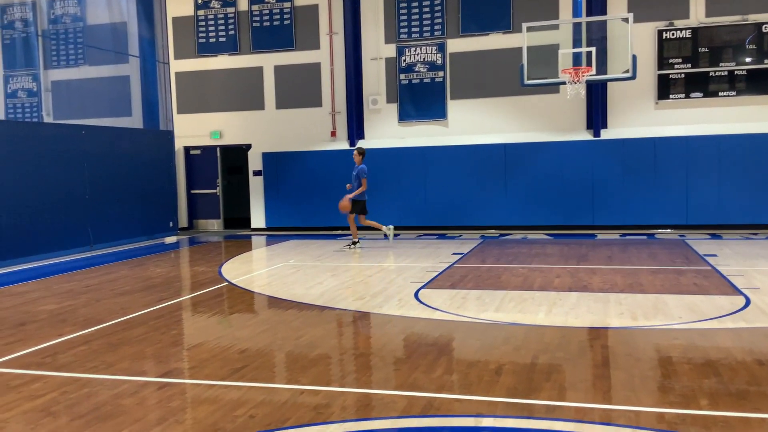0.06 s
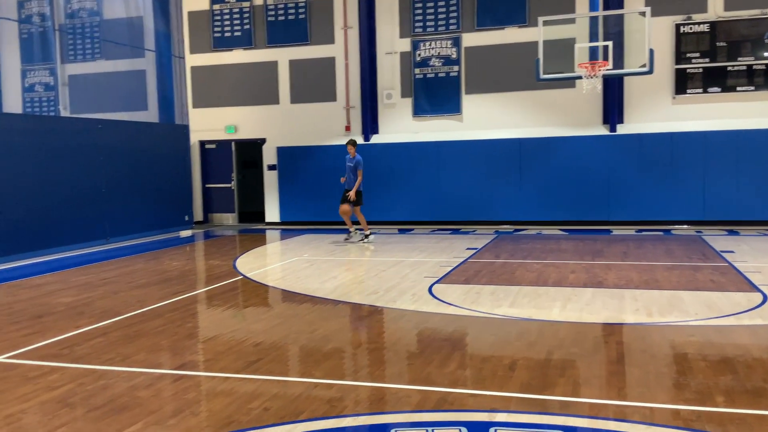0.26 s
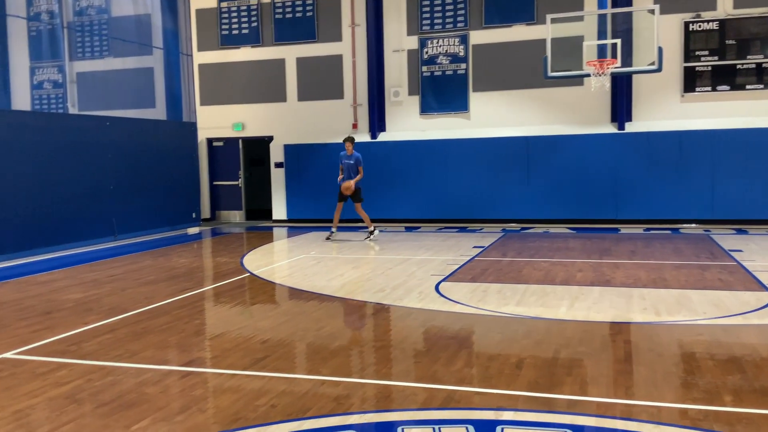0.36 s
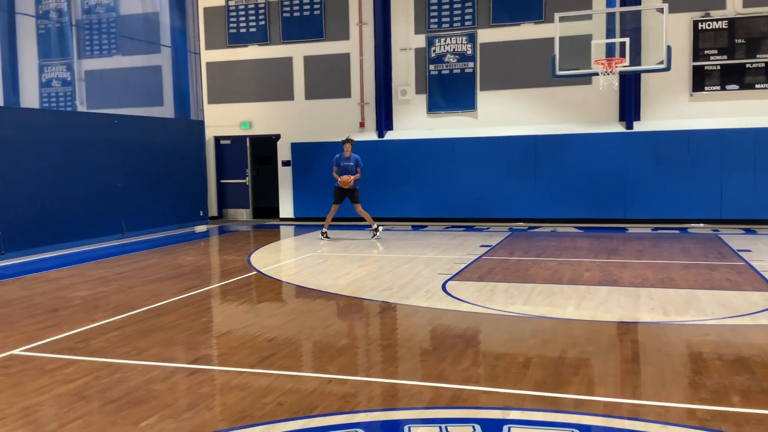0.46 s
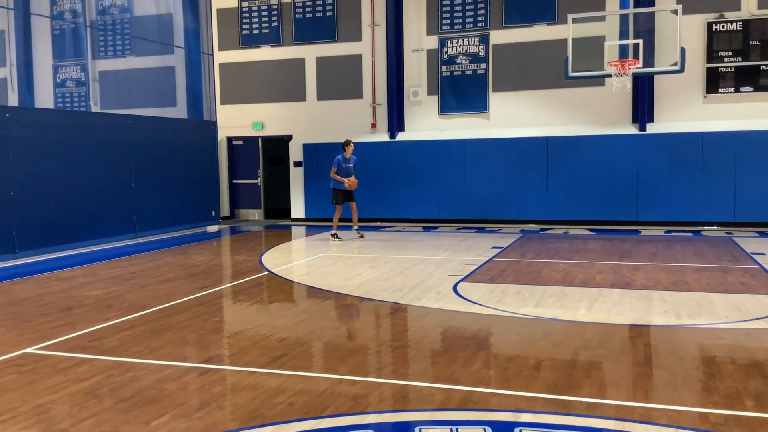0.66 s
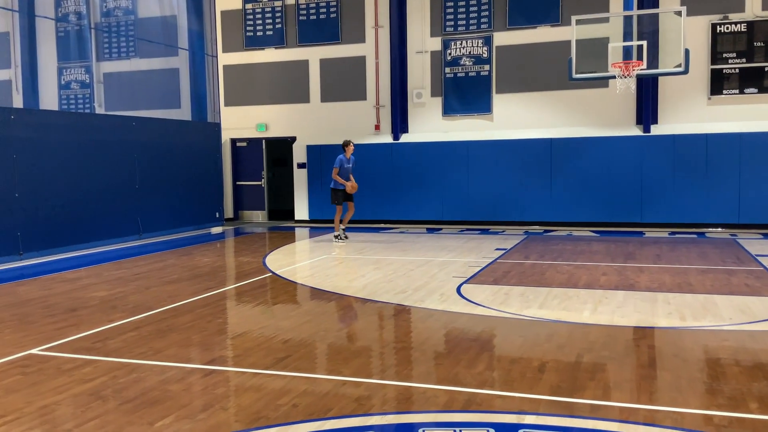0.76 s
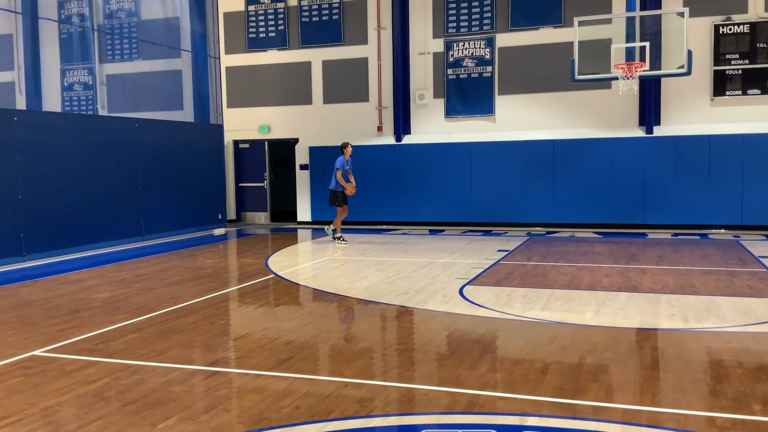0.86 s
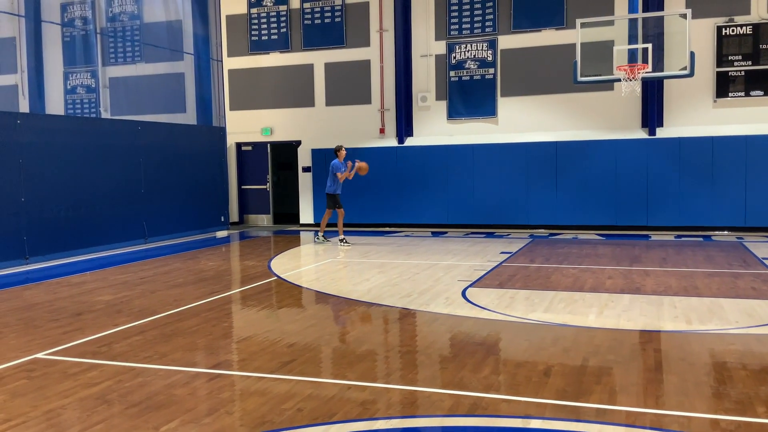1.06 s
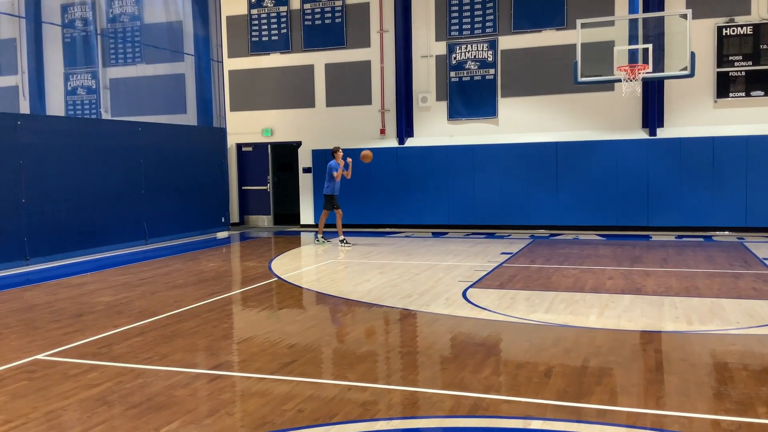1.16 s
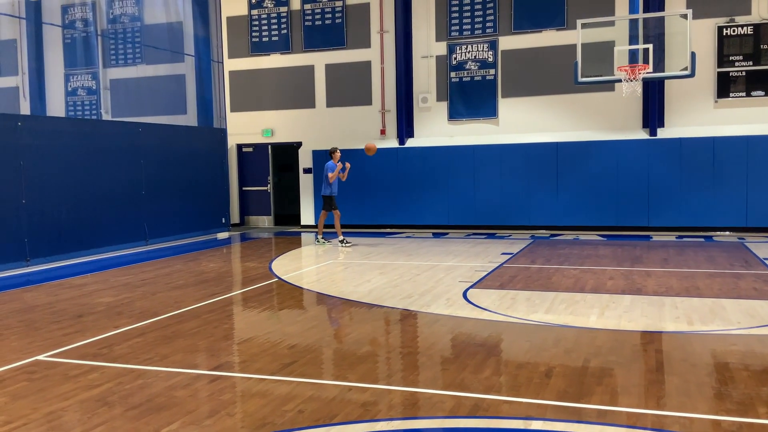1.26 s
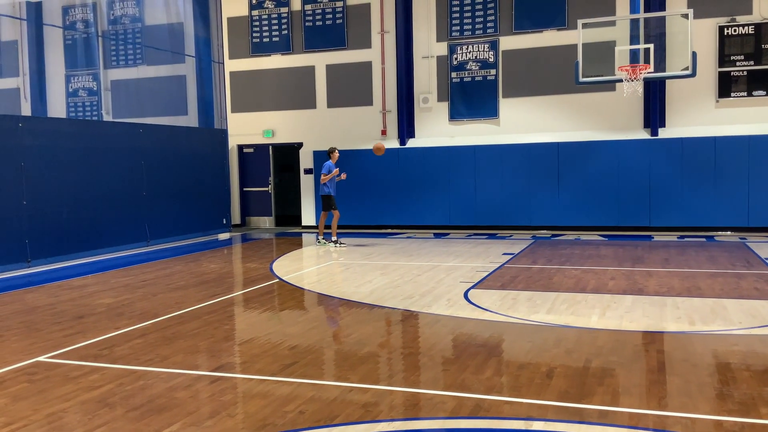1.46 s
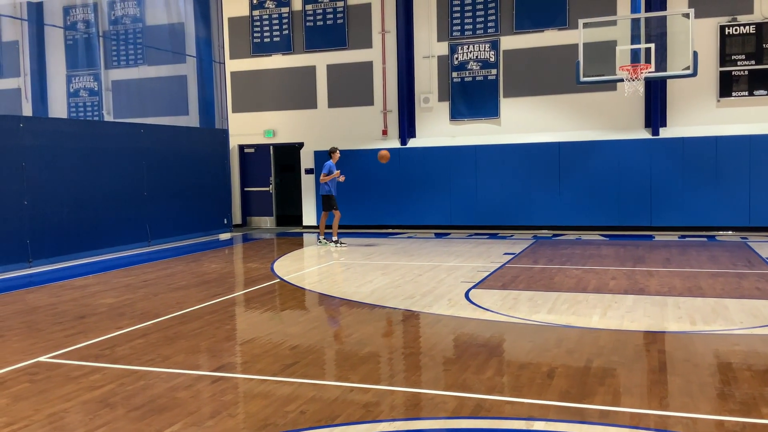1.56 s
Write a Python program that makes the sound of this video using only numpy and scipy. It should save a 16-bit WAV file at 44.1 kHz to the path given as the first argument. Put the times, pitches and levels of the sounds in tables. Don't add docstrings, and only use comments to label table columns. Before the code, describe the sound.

A basketball bounces once on a sprung hardwood floor at about 0.2 seconds: a crisp rubber slap, a short hollow ring and a deep floor boom. Close echoes follow at once, a far-wall return near 0.37, then a long bass-heavy tail fades to the end. Before it, an earlier bounce's tail and tiny squeaks around 0.05-0.1; a faint squeak near 1.2. Low ventilation hum throughout, distant stereo pickup.

```python
import sys
import numpy as np
from scipy import signal
from scipy.fft import rfft, irfft, next_fast_len
from scipy.io import wavfile
from scipy.ndimage import uniform_filter1d, map_coordinates

SR = 44100
rng = np.random.default_rng(int(sys.argv[2]) if len(sys.argv) > 2 else 0)


def field_ratio(decibels):
    return 10 ** (np.asarray(decibels, dtype=float) / 20)


def persist_wave(psi):
    counts = np.round(np.clip(psi, -1, 1) * 32767).astype(np.int16)
    wavfile.write(sys.argv[1], SR, np.atleast_2d(counts).T)


N = 70560
BOUNCE_S = .2029

# frequency in Hz, time to fall 60 dB in seconds.
HALL_DECAY = [(50, 0.73), (100, 3.24), (250, 2.02), (500, 1.8), (1500, 2.23), (4000, 1.64), (8000, 0.77),
              (14000, 1.7)]


def unit(x):
    return x / np.sqrt(np.mean(x ** 2) + 1e-20)


def along(points, hz):
    f, v = np.transpose(points)
    return np.interp(np.log(hz + 1), np.log(f + 1), v)


def filtered(x, response):
    m = 2 * next_fast_len(x.shape[-1] // 2 + SR // 4)
    spectrum = rfft(x, m) * response(np.fft.rfftfreq(m, 1 / SR))
    return irfft(spectrum, m)[..., :x.shape[-1]]


def causal(points):
    def response(hz):
        cepstrum = irfft(np.log(field_ratio(along(points, hz))))
        half = len(cepstrum) // 2
        cepstrum[1:half] *= 2
        cepstrum[half + 1:] = 0
        return np.exp(rfft(cepstrum))[:len(hz)]
    return response


def wobble(rate):
    knots = rng.standard_normal(int(N * rate / SR) + 4)
    return map_coordinates(knots, [np.arange(N) * rate / SR])


def diffuse(spectrum, gain=lambda hz, t: 1, patchy_db=0):
    # frequency in Hz, correlation from -1 to 1.
    likeness = [(40, .997), (100, .98), (280, .9), (600, .4), (1100, .35), (2200, .5), (4200, .27),
                (8000, .6), (12500, .95)]

    def mid_side(hz):
        angle = np.arccos(np.clip(along(likeness, hz), -1, 1)) / 2
        return field_ratio(along(spectrum, hz)) * [np.cos(angle), np.sin(angle)]

    mid, side = filtered(rng.standard_normal((2, N)), mid_side)
    stereo = unit(np.array([mid + side, mid - side]))
    hz, t, z = signal.stft(stereo, SR, nperseg=512, noverlap=448)
    patches = uniform_filter1d(rng.standard_normal(z.shape[1:]), size=5, axis=0)
    patches = uniform_filter1d(patches, size=40, axis=1)
    z = z * gain(hz[:, None], t) * field_ratio(patchy_db * unit(patches))
    return signal.istft(z, SR, nperseg=512, noverlap=448)[1][:, :N]


def hum():
    # frequency in Hz, density in dB per Hz.
    air_noise = [(12, -1), (20, -1), (134, -7.5), (182, -16.5), (248, -16.5), (949, -33), (1090, -30),
                 (11400, -49), (16000, -45)]
    # frequency in Hz, level in dB.
    fan_tones = [
        (59.2, -42.5),
        (97, -65.5),
        (123.8, -49),
        (2100, -72.5),
    ]
    t = np.arange(N) / SR
    tones = np.zeros(N)
    for hz, db in fan_tones:
        tones += field_ratio(db + 2.7 * wobble(16)) * np.sin(2 * np.pi * hz * t + 0.81 * wobble(8))
    return field_ratio(-40.5) * diffuse(air_noise, patchy_db=2.0) + tones


def tail(start, db):
    # frequency in Hz, density in dB per Hz.
    tail_colour = [(15, -11), (25, -1), (82, 1.5), (677, -28.5), (887, -27.5), (2690, -32), (4370, -33),
                   (12900, -50.5), (16000, -52)]
    # frequency in Hz, seconds until the tail is dense.
    build_up = [(60, .13), (160, .09), (400, .03), (3000, .03), (12000, .03)]

    def gain(hz, t):
        age = np.maximum(t - start, 0)
        rise = 1 - np.exp(-(age / along(build_up, hz)) ** 2)
        return rise * field_ratio(-60 * (age - .15) / along(HALL_DECAY, hz))

    return field_ratio(db) * diffuse(tail_colour, gain, patchy_db=1.5)


def squeaks():
    # start in seconds, frequency in Hz, level in dB, length in seconds.
    contacts = [
        (.046, 5390, -52, .009),
        (.068, 883, -52, .01),
        (.07, 3230, -62, .008),
        (.078, 1750, -54, .02),
        (1.18, 931, -63, .14),
    ]
    t = np.arange(N) / SR
    out = np.zeros(N)
    for s, hz, db, length in contacts:
        swell = np.sin(np.pi * np.clip((t - s) / length, 0, 1))
        out += field_ratio(db) * swell * np.sin(2 * np.pi * hz * t + .9 * wobble(40))
    return out


def gym(x):
    fading = diffuse([(100, 0), (16000, 0)], lambda hz, t: field_ratio(-60 * t / along(HALL_DECAY, hz)))
    return signal.fftconvolve(x[None], fading / np.linalg.norm(fading[0]), axes=1)[:, :N]


def boom():
    # start in seconds, frequency in Hz, level in dB, rise in seconds, hold in seconds.
    floor_booms = [
        (.2052, 88, -16.5, .015, .045),
        (.2020, 145, -17.5, .036, .004),
        (.3695, 85, -22.5, .016, .045),
        (.345, 138, -25, .02, .02),
        (.44, 66, -27, .03, .04),
        (.66, 72, -30, .03, .04),
    ]
    sag_per_s, t60 = 2.5, .06
    out = np.zeros(N)
    for s, hz, db, rise, hold in floor_booms:
        t = np.maximum(np.arange(N) / SR - s, 0)
        swell = np.sin(np.pi / 2 * np.minimum(t / rise, 1))
        fall = field_ratio(-60 * np.maximum(t - rise - hold, 0) / t60)
        turns = hz * (1 - np.exp(-sag_per_s * t)) / sag_per_s
        out += field_ratio(db) * swell * fall * np.sin(2 * np.pi * turns)
    return out


def slap():
    # frequency in Hz, gain in dB.
    slap_colour = [(300, -20), (1300, 3), (2300, 5), (3600, 4.5), (5800, -3), (8300, 2), (12500, 0),
                   (16000, -2)]
    twin_s, twin_db = .00035, -6
    fizz_t60, fizz_db = .022, -22
    t = np.arange(N) / SR - BOUNCE_S
    fizz = field_ratio(fizz_db - 60 * np.abs(t) / fizz_t60) * (t > 0) * rng.standard_normal(N)
    crack = np.sinc(t * SR) + field_ratio(twin_db) * np.sinc((t - twin_s) * SR)
    return field_ratio(-4.5) * filtered(crack + fizz, causal(slap_colour))


def ball():
    # frequency in Hz, level in dB, time to fall 60 dB in seconds.
    bounce_tones = [(314, -31, .12), (385, -29, .12), (430, -32, .12), (560, -40, .2), (757, -44, .2),
                    (897, -34, .16), (1034, -38, .12), (1136, -29, .11), (1205, -37, .2), (1520, -29, .02),
                    (1704, -32, .15), (2290, -44, .12)]
    rise_s = .0003
    t = np.maximum(np.arange(N) / SR - BOUNCE_S, 0)
    out = np.zeros((2, N))
    for hz, db, t60 in bounce_tones:
        skew = rng.normal(0, .35) * np.array([[1], [-1]]) * min(hz / 1200, 1)
        envelope = field_ratio(db - 60 * t / t60) * (1 - np.exp(-t / rise_s))
        out += envelope * np.sin(2 * np.pi * hz * t + skew)
    return out


def ripple():
    extra_hz, end_hz, fall_s, length_s = 704, 131.5, 0.00398, 0.018
    t = np.maximum(np.arange(N) / SR - BOUNCE_S, 0)
    turns = end_hz * t + extra_hz * fall_s * (1 - np.exp(-t / fall_s))
    return field_ratio(-22) * np.sin(np.pi * np.minimum(t / length_s, 1)) * np.sin(2 * np.pi * turns)


def walls(x):
    # delay in seconds, level in dB, left over right in dB,
    # dullness in dB per octave from 6 kHz.
    ways = [
        (0, 0, -2.5, 0),
        (.0160, 0, 1.5, -4.5),
        (.0325, -6, -1.5, -2.5),
        (.0745, -17, -3, 2),
        (.0805, -19, 4, 2),
        (.165, -20, 0, -1),
        (.208, -22, 0, 0),
    ]

    def response(hz):
        octaves = np.log2(np.maximum(hz, 2400) / 6000)
        total = 0
        for s, db, pan_db, dull_db in ways:
            sides_db = np.array([[pan_db / 2], [-pan_db / 2]])
            total = total + field_ratio(db - dull_db * octaves + sides_db) * np.exp(-2j * np.pi * hz * s)
        return total

    return filtered(x, response)


def scatter(x):
    count, first_s, last_s = 40, .03, .3
    late, size, side = rng.random((count, 3)).T
    at = np.round((first_s + late * (last_s - first_s)) * SR).astype(int)
    gain = field_ratio(-27 - 9 * late + 8 * (size - .5))
    left = np.bincount(at, gain * np.sqrt(2 * side))
    right = np.bincount(at, gain * np.sqrt(2 - 2 * side))
    echoes = signal.fftconvolve(x[None], np.array([left, right]), axes=1)[:, :N]
    return filtered(echoes, lambda hz: 1 / (1 + 1j * hz / 6000))


def scene():
    tail_db, earlier_s, earlier_db = -25, -0.47, -3.5
    crack, ring, small = slap(), ball(), squeaks()
    near = walls(crack + ring + small) + scatter(crack) + boom() + ripple()
    far = tail(BOUNCE_S, tail_db) + tail(earlier_s, tail_db + earlier_db)
    smeared = gym(field_ratio(-4) * ring[0] + field_ratio(5.5) * small)
    return near + far + smeared + hum()


def low_pass(x):
    return signal.sosfilt(signal.butter(12, 16540, fs=SR, output="sos"), x)


def record(dry):
    # frequency in Hz, left over right in dB.
    side_balance = [(100, -.7), (300, -1.8), (600, 0), (1100, 3.5), (2200, -2.2), (4200, -1.8), (8000, .5),
                    (14000, 0)]
    # frequency in Hz, extra left lead in radians.
    extra_lead = [(480, 0), (690, 1.1), (1030, .7), (1380, -1), (2200, -.4), (3500, 0)]
    lead_s, lag_s = .00023, .00066
    top_hz, top_db, cut_hz, bass_hz = 15250, -12, 16550, 30

    def response(hz):
        lead = np.minimum(2 * np.pi * hz * lead_s, np.pi - 2 * np.pi * hz * lag_s) + along(extra_lead, hz)
        half_db = along(side_balance, hz) / 2
        ports = np.array([field_ratio(half_db) * np.exp(1j * lead), field_ratio(-half_db)])
        treble = field_ratio(top_db * (hz > top_hz)) * (hz < cut_hz)
        return ports * treble / (1 + (bass_hz / (hz + 1)) ** 4)

    return low_pass(filtered(dry, response))


dry = scene()
out = record(dry)
persist_wave(out)
```